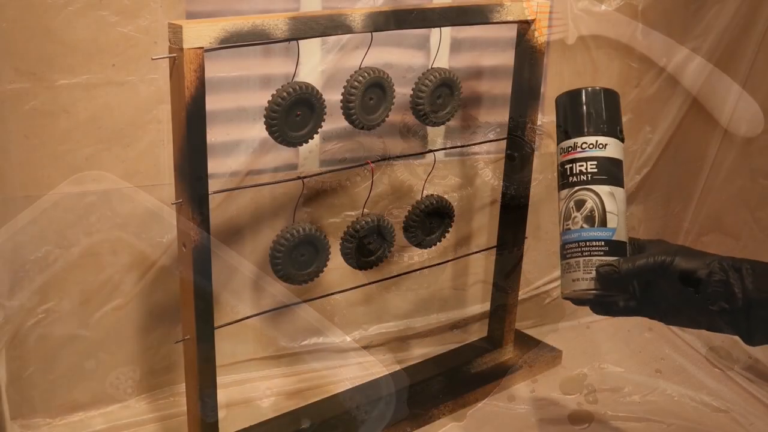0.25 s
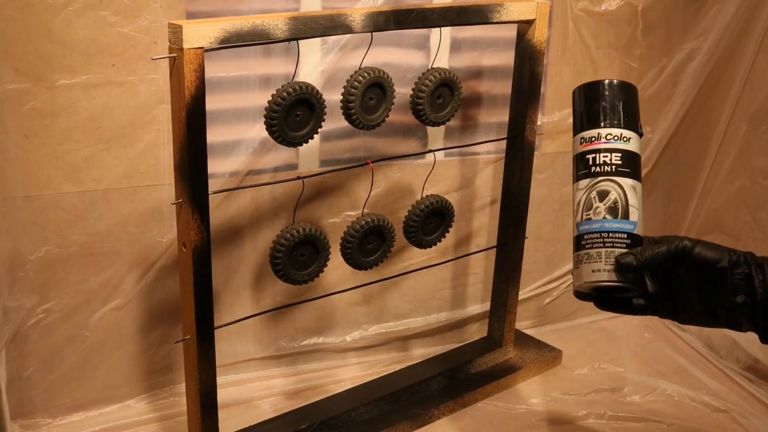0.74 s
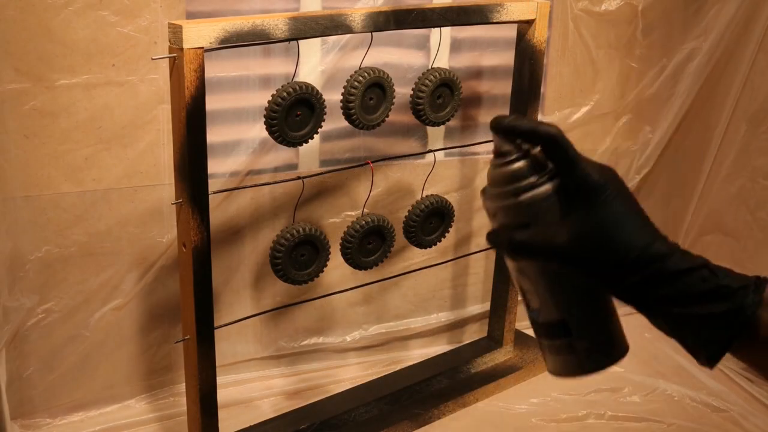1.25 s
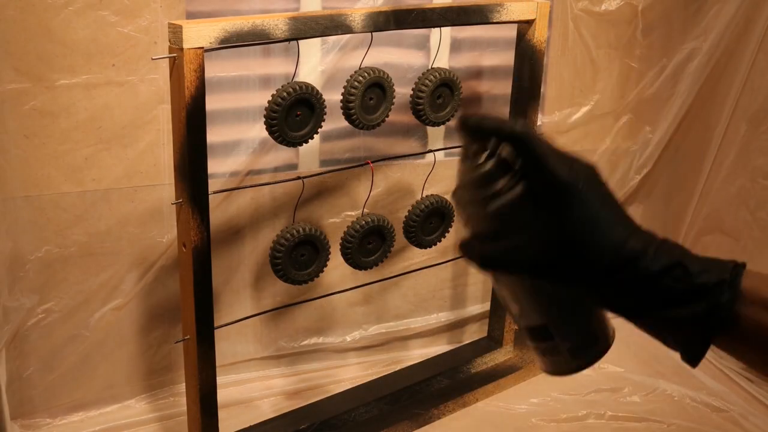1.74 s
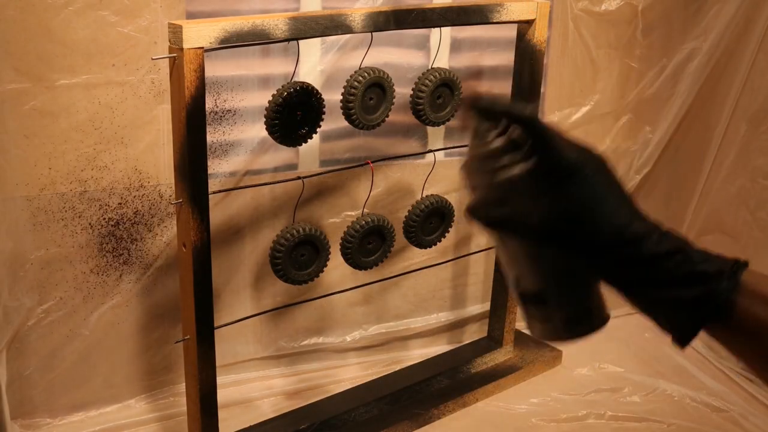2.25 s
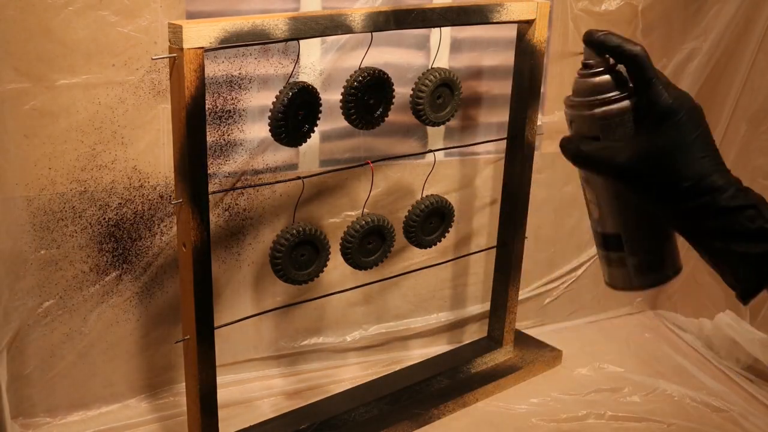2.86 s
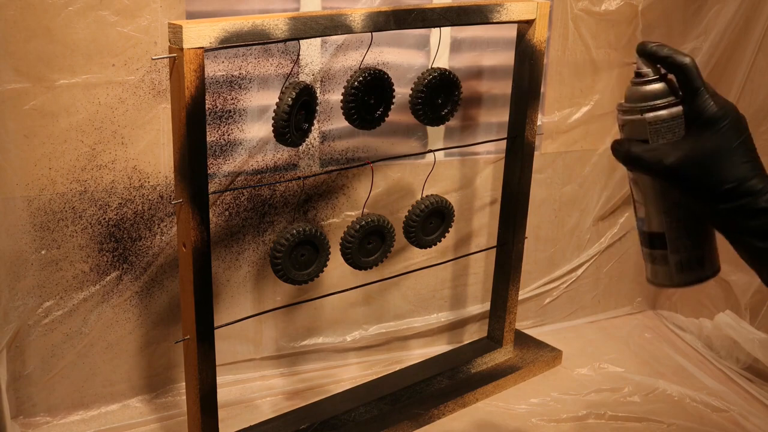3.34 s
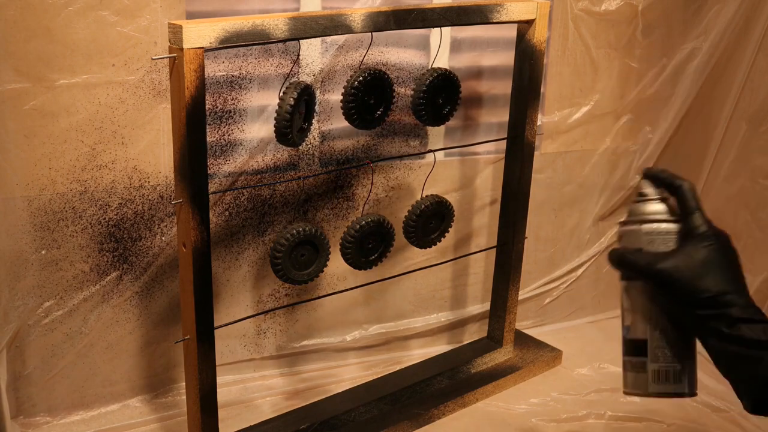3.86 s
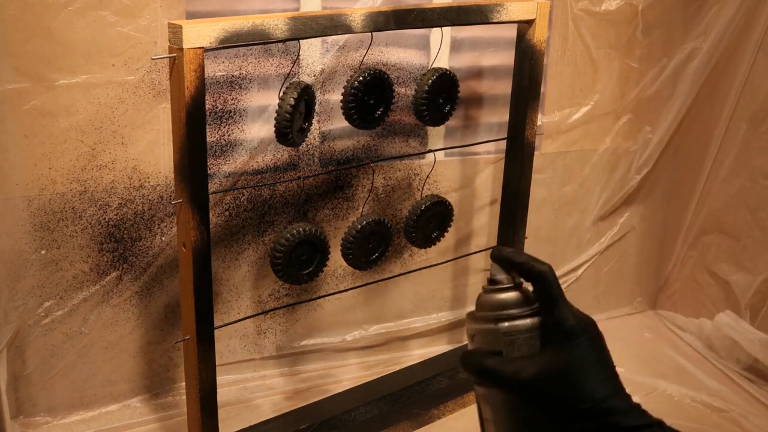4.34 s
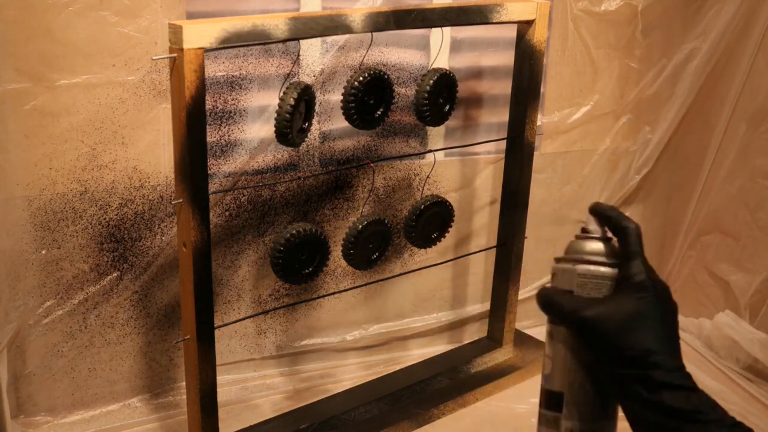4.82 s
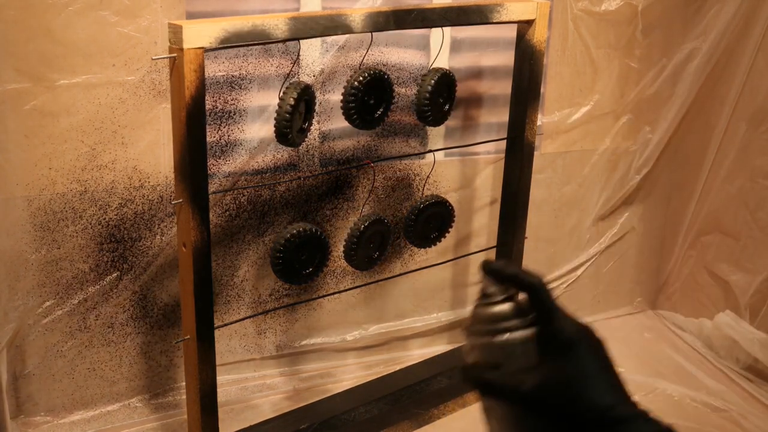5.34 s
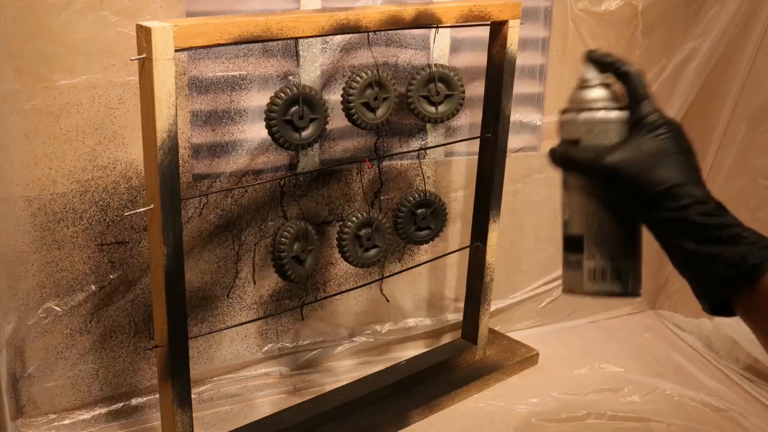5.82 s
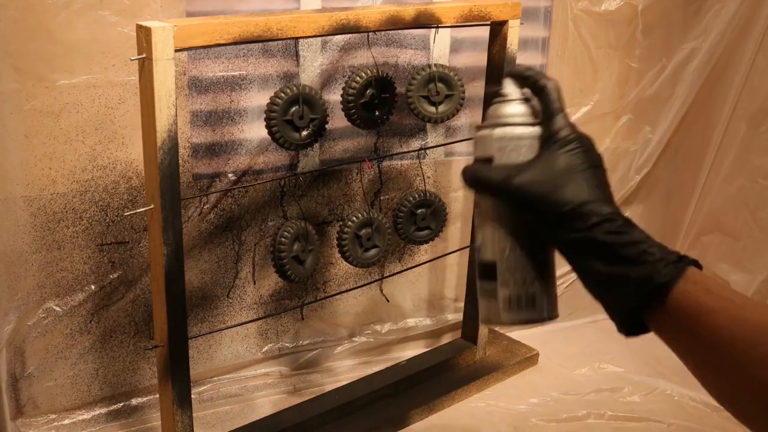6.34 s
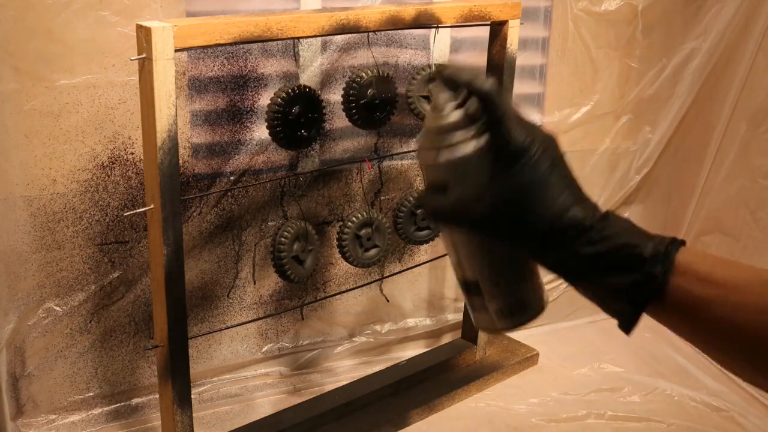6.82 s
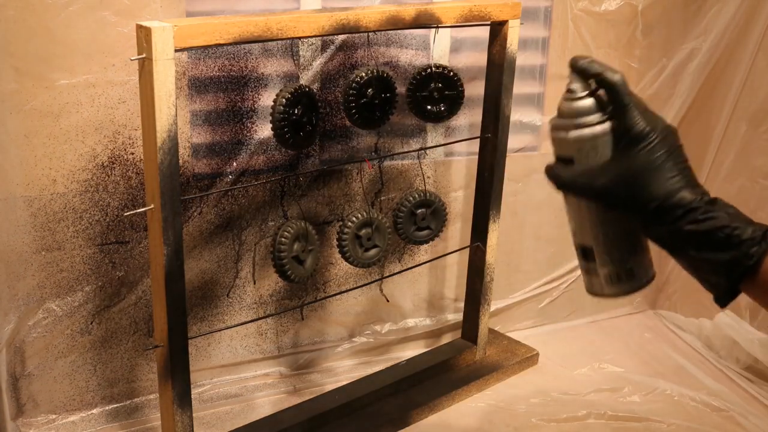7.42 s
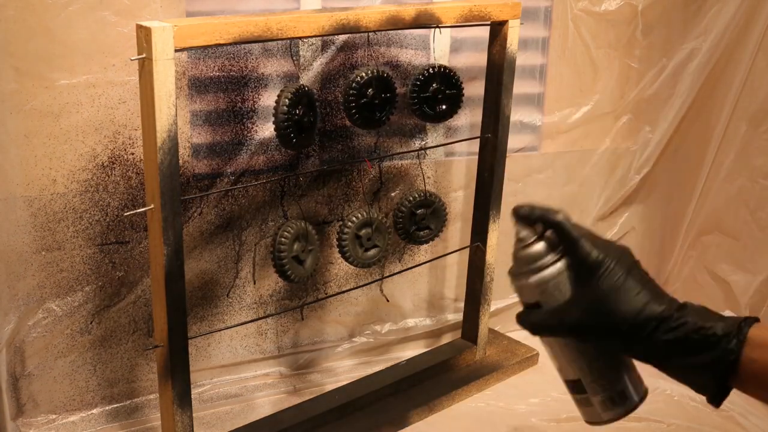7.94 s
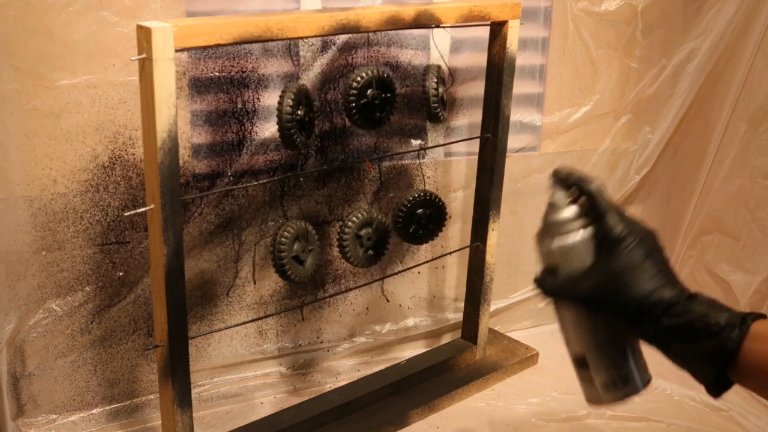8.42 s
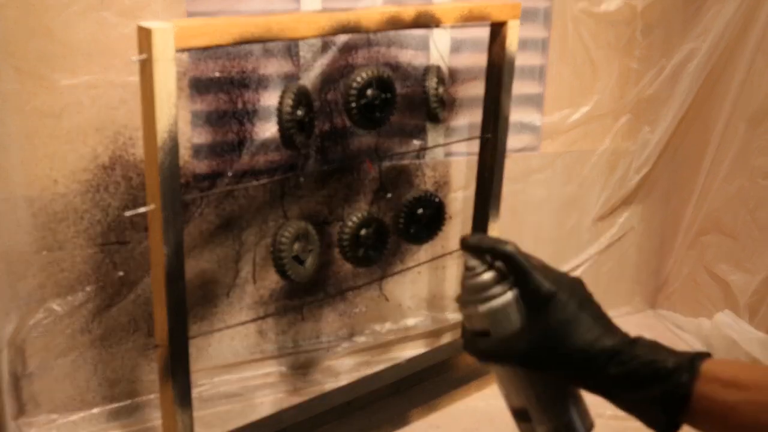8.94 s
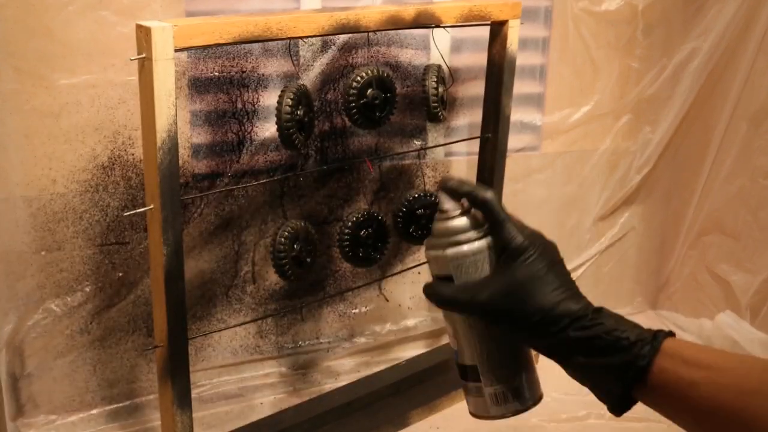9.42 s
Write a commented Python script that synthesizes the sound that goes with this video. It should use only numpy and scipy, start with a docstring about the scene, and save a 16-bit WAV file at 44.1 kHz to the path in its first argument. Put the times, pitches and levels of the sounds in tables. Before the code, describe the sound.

A shaken paint can clacks and knocks throughout, joined by a thin, high spraying hiss with short breaks, over faint room hum.

```python
"""After a moment of silence, low room noise opens and three soft low thumps land; a throbbing hum follows.
A can of spray paint is shaken and sprayed in bursts in a workshop hung with plastic sheet.
The mixing ball knocks, bounces and rolls in the thin steel can, a little to the right: filtered noise plus wall modes.
The nozzle's narrow hiss sits near the centre and a broader mist leans right: filtered noise, gated and wavering.
Thumps are decaying sines with a noise rustle; the hum is two wandering tones beating together."""
import sys
import numpy as np
from scipy import signal
from scipy.fft import rfft, irfft, next_fast_len
from scipy.io import wavfile
from scipy.ndimage import uniform_filter1d, map_coordinates

SR = 44100
rng = np.random.default_rng(int(sys.argv[2]) if len(sys.argv) > 2 else 0)


def unload_wav(signal):
    """Save mono or channel-first audio to the path in sys.argv[1] as 16-bit WAV at rate SR, clipped to [-1, 1]."""
    wavfile.write(
        sys.argv[1],
        SR,
        np.round(np.clip(np.atleast_2d(signal).T, -1, 1) * 32767).astype(np.int16),
    )


N = 426447

# All table levels are relative: the functions trim and mix them.
# spectrum of the room noise: (frequency [Hz], gain [dB])
FLOOR_COLOUR = [(20, -26), (40, -21), (65, -5), (100, -6.5), (150, -6.5), (220, -14), (500, -19.5),
                (1500, -24), (3000, -31.5), (7000, -43.5), (10000, -56), (15000, -69)]
# the room's hum over time: (time [s], level [dB])
HUM_LEVEL = [(1.08, -60.5), (2.66, -58), (4.0, -64), (8.2, -62.5), (8.8, -60), (9.15, -79)]
# soft low thumps: (time [s], level [dB])
THUMP_HITS = [(0.717, -44), (0.89, -42.5), (1.053, -52.5)]
# ringing modes of the can's wall: (frequency [Hz], mean strength [dB], decay t60 [s])
WALL_MODES = [(850, -20, 0.04), (1196, -7, 0.1), (1357, -3, 0.077), (1461, -2.5, 0.1), (1620, 11.5, 0.022),
              (1798, 4, .07), (2064, 16, 0.016), (2228, 7.5, 0.027), (2695, 7, 0.034)]
# spectrum of the hollow knock, before it is pitched: (frequency [Hz], gain [dB])
KNOCK_COLOUR = [(100, -31.5), (270, -14.5), (480, -20), (800, -4), (1200, -6), (1750, 7), (2400, 0),
                (3300, -12), (5000, -19), (15000, -44)]
# spectrum of the bright steel clack: (frequency [Hz], gain [dB])
CLACK_COLOUR = [(200, -16.5), (1000, -7.5), (2000, -4.5), (3200, 6), (4300, 3), (5500, -2), (7000, -1),
                (8700, -8), (11000, -1), (12500, -13), (15500, -39)]
# spectrum of the rolling ball, before it is pitched: (frequency [Hz], gain [dB])
ROLL_COLOUR = [(200, -20), (600, -12.5), (1200, -10), (1750, -1), (2400, -4), (3300, -7.5), (4500, -11),
               (8000, -19), (11000, -21), (15000, -59)]
# the ball's knocks, ticks and glancing touches in the shaken can; each is followed by rebounds and a roll:
# (time [s], hollow knock level [dB], bright clack level [dB], knock pitch [Hz],
#  delay to the first rebound [s], first rebound level [dB])
BALL_TOUCHES = [(1.086, -62, -35.5, 3300, 0.021, -53), (1.114, -31, -32, 1990, 0.044, -38.5),
                (1.176, -36.5, -39, 2870, .022, -60), (1.198, -52, -40.5, 2710, 0.033, -65),
                (1.263, -27.5, -38.5, 1820, .038, -32), (1.382, -33.5, -36, 3000, 0.012, -40),
                (1.476, -54, -59, 2620, 0.013, -44.5), (1.555, -49, -49, 3220, 0.013, -46),
                (1.617, -34.5, -36.5, 3240, 0.019, -39.5), (1.664, -42, -42, 2220, .014, -63),
                (1.765, -64, -63, 3000, 0.0087, -61), (1.793, -33.5, -41.5, 2100, .027, -40.5),
                (1.856, -38, -32, 2970, 0.019, -32), (2.131, -33.5, -31.5, 2470, 0.079, -44),
                (2.205, -42, -64, 2580, 0.023, -43), (2.314, -44.5, -42, 3600, 0.0084, -40.5),
                (2.506, -27, -38.5, 2190, 0.047, -38), (2.589, -30, -36, 2800, 0.019, -32),
                (2.715, -53, -52.5, 2060, 0.014, -46), (2.82, -47, -56, 2000, 0.0095, -45),
                (2.859, -31, -30, 2540, 0.022, -43), (3.061, -39.5, -45, 2970, .012, -43.5),
                (3.216, -49, -64, 2860, 0.011, -46), (3.332, -37, -35, 2570, .012, -39.5),
                (3.597, -32.5, -32, 2780, 0.028, -36), (3.805, -45, -43, 1880, .01, -47),
                (3.859, -32, -30, 3060, 0.041, -39), (4.007, -35, -53, 2080, .012, -38),
                (4.163, -35, -32.5, 3220, 0.021, -42.5), (4.308, -30.5, -50, 2070, .011, -38),
                (4.438, -41, -41.5, 1980, 0.011, -38.5), (4.625, -30.5, -43, 2120, .01, -36),
                (4.755, -37.5, -38, 1810, .014, -41.5), (4.925, -43, -53, 2100, 0.011, -40),
                (5.08, -37, -33.5, 1860, .014, -40.5), (5.236, -36.5, -59, 2040, .017, -37),
                (5.417, -38.5, -36, 3130, 0.013, -37.5), (5.648, -51, -38.5, 3320, 0.035, -56),
                (5.735, -26.5, -43, 1750, .05, -41), (5.853, -56, -54, 3370, 0.0097, -56.5),
                (5.893, -28.5, -39, 1730, 0.037, -41), (5.909, -32, -30.5, 3540, 0.024, -62),
                (6.014, -23.5, -34.5, 2240, 0.025, -47), (6.114, -26, -35, 1780, 0.033, -39),
                (6.212, -34.5, -32, 3550, 0.033, -33.5), (6.351, -32.5, -42, 1770, 0.017, -41.5),
                (6.406, -36, -32, 2050, 0.037, -35), (6.566, -42, -70, 1560, .01, -38.5),
                (6.656, -38, -33.5, 3270, .02, -39), (6.8, -30.5, -29.5, 1940, 0.036, -34.5),
                (7.027, -39, -31.5, 3250, 0.036, -57), (7.055, -27.5, -37.5, 2200, 0.047, -57),
                (7.148, -27, -31.5, 1920, 0.019, -50), (7.244, -28.5, -37, 2130, 0.045, -34),
                (7.272, -44, -32, 3560, 0.023, -58), (7.424, -33.5, -43.5, 1850, 0.025, -56),
                (7.483, -28, -36.5, 2190, 0.031, -39.5), (7.501, -40, -31, 2810, 0.037, -62),
                (7.589, -29.5, -33.5, 1580, 0.061, -33.5), (7.755, -33.5, -34.5, 3080, .027, -35),
                (7.898, -31.5, -32, 2270, 0.072, -36.5), (8.09, -37, -34, 2000, .063, -43),
                (8.489, -33, -34, 3340, .05, -34), (8.719, -35.5, -40.5, 2900, 0.012, -41),
                (8.929, -33, -34.5, 2100, 0.035, -35.5), (9.148, -33, -33.5, 2400, 0.029, -32),
                (9.309, -45, -53, 1790, 0.0095, -47), (9.535, -32.5, -33.5, 2130, 0.048, -32.5)]
# spectrum of the nozzle's jet, before it is pitched: (frequency [Hz], gain [dB])
JET_COLOUR = [(150, -58), (3500, -39), (6000, -19), (8000, -15.5), (8800, -13), (9300, -5), (10300, -1.5),
              (11300, 0), (12200, -2.5), (13300, -11), (15600, -21)]
# the hiss shifts as the can is turned: (time [s], pitch [Hz])
HISS_GLIDE = [(2.2, 12000), (2.8, 11420), (5.5, 11650), (6.3, 11200), (7.4, 11240), (9.65, 11360)]
# spectrum of the mist where it lands: (frequency [Hz], gain [dB])
MIST_COLOUR = [(200, -10), (700, -7.5), (1800, 2.5), (3000, 1.5), (5000, -1), (7000, -0.5), (8600, 1.5),
               (10000, -14), (15000, -18)]
# the nozzle is pressed:
# (start [s], end [s], rise [s], jet level [dB], jet drift [dB/s], mist level [dB])
NOZZLE_BURSTS = [(1.897, 5.544, 0.095, -38.5, 0.4, -49.5), (6.25, 6.765, 0.079, -38, -6, -54.5),
                 (6.763, 7.876, 0.036, -36, -5, -52), (7.866, 8.145, .02, -54.5, -15, -55),
                 (8.14, 9.7, 0.019, -40.5, 2, -50.5)]
# decay of the sheeted workshop: (frequency [Hz], decay t60 [s])
SHOP_DECAY = [(200, 0.24), (800, 0.21), (2000, 0.11), (6000, 0.12), (14000, 0.12)]
# stereo width: (frequency [Hz], side level re mid [dB], share of the side that follows the mid [0-1])
STEREO_WIDTH = [(60, -23, .05), (130, -11, .05), (271, -4, 0.12), (600, -7, 0.41), (1190, -5.5, 0.5),
                (2290, -2, 0.8), (4470, 0.5, 0.61), (8750, 3.5, 0.43), (15000, -5, .1)]

START_S, TOP_HZ = 0.703, 15800  # the sound opens; centre of the top cutoff
KNOCK_HZ, HISS_HZ = 1783, 11610  # the pitches at which the colours are given
CONTACT = 5.5  # first-touch impulse, against noise of rms 1
BOUNCE_SHRINK, BOUNCE_LOSS_DB = .65, 8.5  # second gap over the first; second rebound's loss
SETTLE_S = .032  # the paint brakes a longer gap to this, times the shrink, after one rebound
BOUNCE_HZ, BOUNCE_CLACK_DB = 2000, -8.5  # rebounds: median pitch, and clack re knock before trims
ROLL_DB, ROLL_LOSS_DB_PER_S = 2.5, 367  # roll re first rebound; long gaps leave less for the roll
ROLL_S = 0.065  # time over which a roll loses its full fade_db
ROLL_HZ, ROLL_FOLLOW = 1770, 0.68  # a roll's base pitch; how far it follows the knock's pitch
JET_SIDE_DB = -12  # side noise added to the jet
# the hiss swells as the can swings through a bright clack
SWELL_DB, SWELL_S, SWELL_LEAD_S, SWELL_MIST = 3, 0.065, 0.004, 0.34  # height, half width, lead, mist's share
DULL_DB, BRIGHT_DB = -2, 3.5  # clack re knock that gives no swell, and a full one


def amp(db):
    """Decibels to gain."""
    return 10 ** (np.asarray(db) / 20)


def unit(x):
    """Scaled to rms 1."""
    return x / np.sqrt(np.mean(x ** 2) + 1e-20)


def along(points, hz, axis=1):
    """One column of a table, read on log frequency."""
    table = np.transpose(points)
    return np.interp(np.log(hz + 1), np.log(table[0] + 1), table[axis])


def wobble(rate):
    """A smooth random curve with rate knots a second."""
    knots = rng.standard_normal(int(N * rate / SR) + 4)
    return map_coordinates(knots, [np.arange(N) * rate / SR])


def coloured(x, points):
    """x through a causal, minimum-phase filter with the given spectrum."""
    n = x.shape[-1]
    m = 2 * next_fast_len(n // 2 + 1024)
    gain_db = along(points, np.fft.rfftfreq(m, 1 / SR))
    cepstrum = irfft(np.log(amp(gain_db)))
    # folding the cepstrum forward makes the filter causal
    cepstrum[1:m // 2] *= 2
    cepstrum[m // 2 + 1:] = 0
    response = np.exp(rfft(cepstrum))
    return irfft(rfft(x, m) * response)[..., :n]


def pitched(points, ratio):
    """A colour slid along the frequency axis."""
    return np.array(points) * [ratio, 1]


def noise(n):
    """Two unrelated noises: one for the middle, one for the sides."""
    return rng.standard_normal((2, n))


def mottled(x, depth_db, band_size=7, time_size=18):
    """Drifting patches of gain in time and frequency, as echoes shift round a moving source."""
    z = signal.stft(x, nperseg=512)[2]
    across_bands = uniform_filter1d(rng.standard_normal(z.shape), band_size, 1)
    field = uniform_filter1d(across_bands, time_size, 2)
    return signal.istft(z * amp(depth_db * unit(field)), nperseg=512)[1][:, :x.shape[1]]


def add(track, s, sound):
    """Mix a sound in at time s."""
    part = track[:, round(s * SR):][:, :sound.shape[1]]
    part += sound[:, :part.shape[1]]


def room_tone(floor_db=-65, hum_hz=117, second_hz=108.4, hum_db=-2, throb=1.0, lumpy_db=3):
    """Low room noise and two close hum tones that beat unevenly against each other."""
    t = np.arange(N) / SR
    first = np.sin(2 * np.pi * np.cumsum(hum_hz + 7 * wobble(25)) / SR)
    second = np.sin(2 * np.pi * np.cumsum(second_hz + 9 * wobble(19)) / SR)
    hum = unit((first + throb * second) * amp(lumpy_db * wobble(18)))
    hum *= amp(hum_db + np.interp(t, *np.transpose(HUM_LEVEL)))
    hum *= np.clip((t - HUM_LEVEL[0][0]) / 0.025, 0, 1)
    floor = amp(floor_db) * unit(coloured(noise(N), FLOOR_COLOUR))
    return floor + hum * [[1], [0]]  # the hum feeds only the mid


def thumps(boom_hz=80, t60=0.29, rustle_db=-25):
    """Dull bumps, each a decaying low sine with a faint noise rustle."""
    out, t = np.zeros((2, N)), np.arange(SR // 3) / SR
    rustle_colour = [(300, -18), (2500, -9), (3350, 15), (4200, -10), (7000, -4), (10000, -22)]
    for s, db in THUMP_HITS:
        boom = np.sin(2 * np.pi * boom_hz * t) * amp(-60 * t / t60)
        rustle = unit(coloured(noise(len(t)), rustle_colour)) * amp(-60 * t / 0.46)
        attack = 1 - np.exp(-t / 0.0064)
        add(out, s, amp(db) * attack * (boom + amp(rustle_db) * rustle))
    return out


def wall_ring(t):
    """The wall's modes, at new strengths wherever the ball lands."""
    hz, db, t60 = np.transpose(WALL_MODES)[:, :, None]
    shape = (2, len(WALL_MODES), 1)
    strength = amp(db + 0.57 * rng.standard_normal(shape) - 60 * t / t60)
    phase = 2 * np.pi * rng.random(shape)
    modes = strength * np.sin(2 * np.pi * hz * t + phase)
    return unit(modes.sum(1) * (1 - np.exp(-t / 0.00078)))


def blow(knock_db, clack_db, hz, knock_t60=0.054, clack_t60=0.044, ring_db=-6,
         knock_gain_db=-12, clack_gain_db=-9, clack_patchy_db=3):
    """A sharp contact, a bright clack of steel and a hollow knock, all damped by the paint."""
    t = np.arange(SR // 8) / SR
    shudder = noise(len(t)) * amp(-60 * t / knock_t60) * (1 - np.exp(-t / 0.00037))
    knock = unit(coloured(shudder, pitched(KNOCK_COLOUR, np.sqrt(hz / KNOCK_HZ))))
    knock = unit(knock + amp(ring_db) * wall_ring(t))
    # every spot on the wall rings with its own set of high modes
    contact = mottled(noise(len(t)), clack_patchy_db) * amp(-60 * t / clack_t60)
    contact[:, 0] += CONTACT  # the first touch stands out over the ringing
    clack = unit(coloured(contact, CLACK_COLOUR))
    return amp(knock_db + knock_gain_db) * knock + amp(clack_db + clack_gain_db) * clack


def roll(db, hz, taps_per_s=450, tap_t60=0.063, fade_db=9, patchy_db=3, ring_db=-4):
    """The ball skitters round the wall: a fading run of tiny taps that keep the wall ringing."""
    t = np.arange(SR // 4) / SR
    tap_t = t[:SR // 20]
    taps = (rng.random(len(t)) < taps_per_s / SR) * rng.standard_normal(len(t))
    # the decaying energy of all the taps shapes the scrape
    energy = signal.fftconvolve(taps ** 2, amp(-60 * tap_t / tap_t60) ** 2)[:len(t)]
    flutter = np.sqrt(abs(energy))
    colour = pitched(ROLL_COLOUR, np.sqrt(hz / KNOCK_HZ))
    scrape = coloured(flutter * mottled(noise(len(t)), patchy_db), colour)
    ring = signal.fftconvolve(taps[None], wall_ring(tap_t), axes=1)[:, :len(t)]
    shape = (1 - np.exp(-t / 0.00066)) * amp(-fade_db * (t / ROLL_S) ** 1.58)
    # low-pitched runs are the ones that set the wall's main modes going
    run = unit(shape * scrape) + amp(ring_db) * (KNOCK_HZ / hz) ** 2 * unit(shape * ring)
    return amp(db) * np.sqrt(np.mean(shape ** 2)) * unit(run)


def ball(count=2):
    """Each row is one blow, then two rebounds, the second softer, with a roll from the first rebound."""
    out = np.zeros((2, N))
    for s, knock_db, clack_db, hz, gap, rebound_db in BALL_TOUCHES:
        add(out, s, blow(knock_db, clack_db, hz))
        later = min(gap, SETTLE_S) * BOUNCE_SHRINK ** np.arange(1, count)
        for k, delay in enumerate(np.cumsum([gap, *later])):
            db = rebound_db - BOUNCE_LOSS_DB * k
            bounce_hz = BOUNCE_HZ * np.exp(0.27 * rng.standard_normal())
            add(out, s + delay, blow(db, db + BOUNCE_CLACK_DB, bounce_hz))
        roll_db = rebound_db + ROLL_DB - ROLL_LOSS_DB_PER_S * gap
        roll_hz = ROLL_HZ * (hz / KNOCK_HZ) ** ROLL_FOLLOW
        add(out, s + gap, roll(roll_db, roll_hz))
    return out


def swing(t):
    """0 to 1: rises round each bright clack, where the shake turns."""
    near = np.zeros(N)
    for s, knock_db, clack_db, *_ in BALL_TOUCHES:
        bright = np.clip((clack_db - knock_db - DULL_DB) / (BRIGHT_DB - DULL_DB), 0, 1)
        span = slice(*np.searchsorted(t, [s - .3, s + .3]))
        bump = np.exp(-((t[span] - s + SWELL_LEAD_S) / SWELL_S) ** 2)
        near[span] = np.maximum(near[span], bright * bump)
    return near


def jet_noise():
    """The nozzle's noise, its peak sliding as the can is turned."""
    hz, t, z = signal.stft(noise(N), SR, nperseg=512)
    ratio = np.interp(t, *np.transpose(HISS_GLIDE)) / HISS_HZ
    gain = amp(along(JET_COLOUR, hz[:, None] / ratio))
    return signal.istft(z * gain, nperseg=512)[1][:, :N]


def spray(jet_db=0, mist_db=2.5, sputter_db=1.54, jet_patchy_db=2.5, mist_patchy_db=2.6,
          valve_s=0.0085, waver_db=-0.34):
    """The nozzle's jet hisses near 11 kHz; the mist rushes more broadly where it lands. Returns both."""
    t = np.arange(N) / SR
    jet = mottled(jet_noise(), jet_patchy_db, band_size=4, time_size=6)
    jet = unit(jet * amp(sputter_db * wobble(160)))
    mist = mottled(coloured(noise(N), MIST_COLOUR), mist_patchy_db, band_size=4, time_size=6)
    mist = unit(mist * amp(0.88 * wobble(120)))
    jet_gain, mist_gain = np.zeros((2, N))
    for start, end, rise, nozzle_db, drift, landing_db in NOZZLE_BURSTS:
        closing = np.exp(-(np.maximum(t - end, 0) / valve_s) ** 2)
        valve = np.clip((t - start) / rise, 0, 1) * closing
        drift_db = drift * (np.clip(t, start, end) - start)
        jet_gain += valve ** 2 * amp(nozzle_db + drift_db)  # the jet needs a fully open valve
        mist_gain += np.sqrt(valve) * amp(landing_db)
    aim_db = SWELL_DB * swing(t) + waver_db * wobble(11)
    jet = jet * jet_gain * amp(jet_db + aim_db)
    mist = mist * mist_gain * amp(mist_db + SWELL_MIST * aim_db)
    return jet, mist


def centred(x, echo_s=.00133):
    """The jet sits near the centre; a close reflection combs its width."""
    mid, diffuse = x
    echo = np.pad(diffuse, (round(echo_s * SR), 0))[:N]
    side = amp(JET_SIDE_DB) * (diffuse + echo)
    return np.array([mid + side, mid - side])


def reflections(x):
    """The short answer of the sheeted walls: decaying noise, 5 ms behind the source."""
    hz, t, z = signal.stft(noise(SR // 3), SR, nperseg=256)
    decay = amp(-60 * t / along(SHOP_DECAY, hz)[:, None])
    tail = signal.istft(z * decay, SR, nperseg=256)[1]
    tail = np.pad(tail / np.linalg.norm(tail[0]), ((0, 0), (round(.005 * SR), 0)))
    return signal.fftconvolve(x, tail, axes=1)[:, :N]


def stereo(x, lean):
    """Direct sound leads in phase and is louder on the right; lean is the side's phase lag [rad]."""
    m = next_fast_len(N + 4096)
    hz = np.fft.rfftfreq(m, 1 / SR)
    mid, diffuse = rfft(x, m)
    direct = np.clip(along(STEREO_WIDTH, hz, axis=2), 0, 1)
    blend = direct * np.exp(-1j * lean) * mid + np.sqrt(1 - direct ** 2) * diffuse
    side = amp(along(STEREO_WIDTH, hz)) * blend
    return irfft(np.array([mid + side, mid - side]), m)[:, :N]


def scene(wet_db=-10.5, spray_wet_db=-21):
    """Thumps, rattle, spray and room together."""
    rattle = ball()
    jet, mist = spray()
    room = reflections(amp(wet_db) * rattle + amp(spray_wet_db) * (jet + mist))
    close = stereo(rattle + thumps(), lean=2.24)
    around = stereo(mist + room + room_tone(), lean=1.9)
    return centred(jet) + close + around


def record(dry):
    """Silence until the sound is switched in; a steep cutoff removes the top treble."""
    opened = dry * np.clip((np.arange(N) / SR - START_S) / 0.0035, 0, 1)
    m = next_fast_len(N + 4096)
    cutoff = np.clip((TOP_HZ - np.fft.rfftfreq(m, 1 / SR)) / 150 + .5, 0, 1)  # 150 Hz wide
    return irfft(rfft(opened, m) * cutoff, m)[:, :N]


dry = scene()
out = record(dry)
unload_wav(out)
```